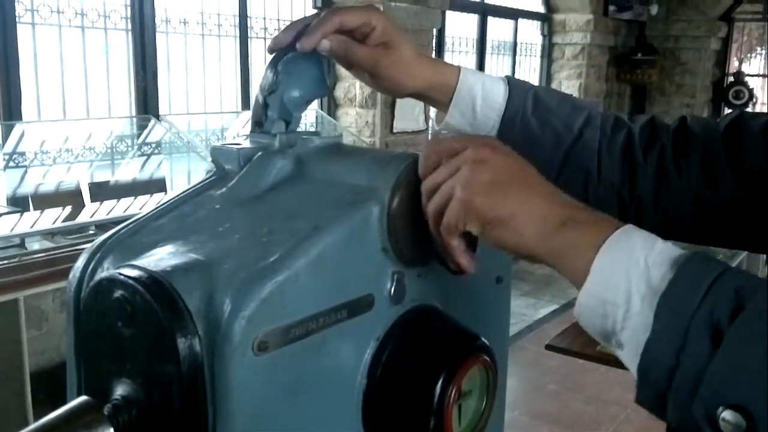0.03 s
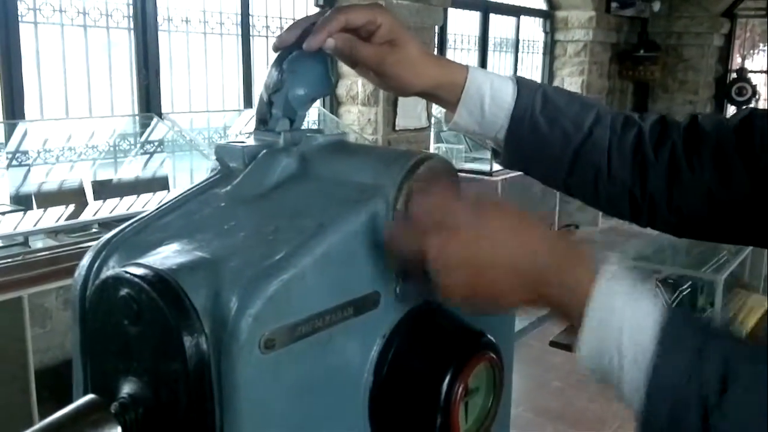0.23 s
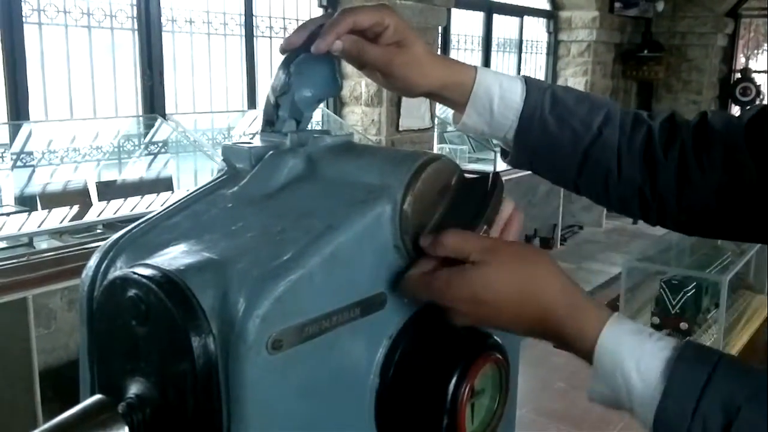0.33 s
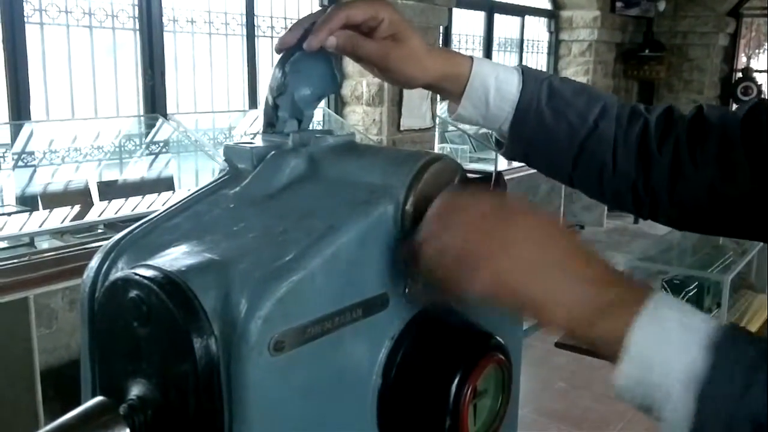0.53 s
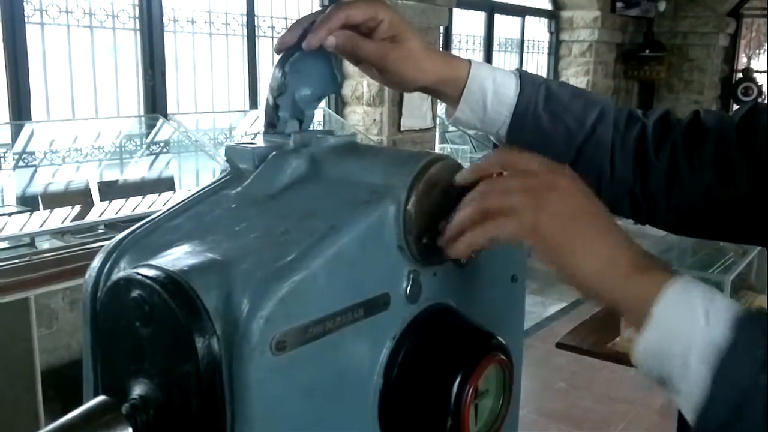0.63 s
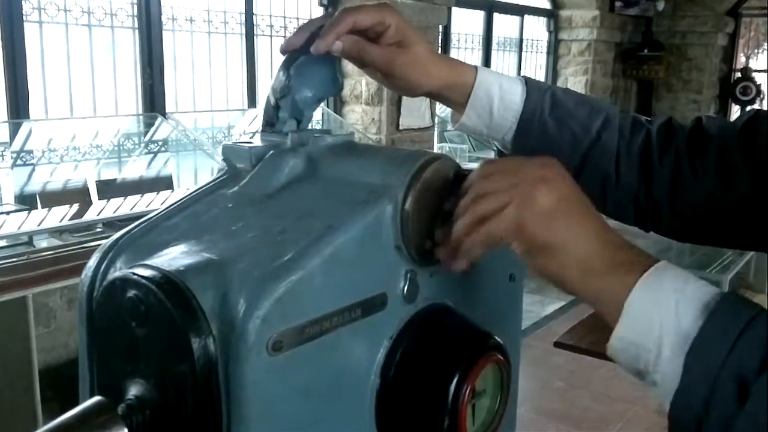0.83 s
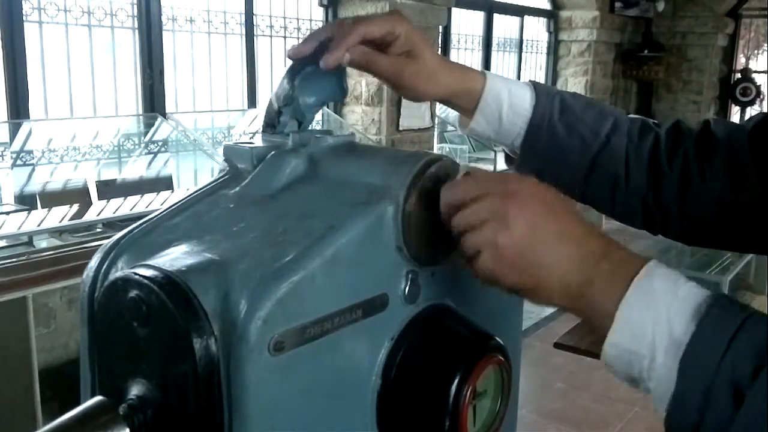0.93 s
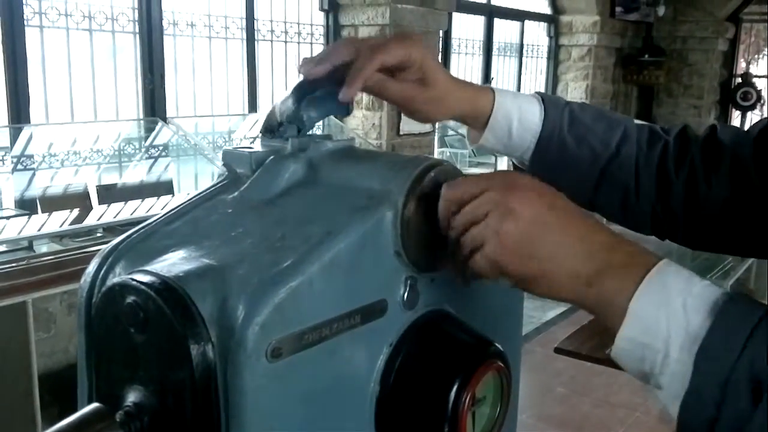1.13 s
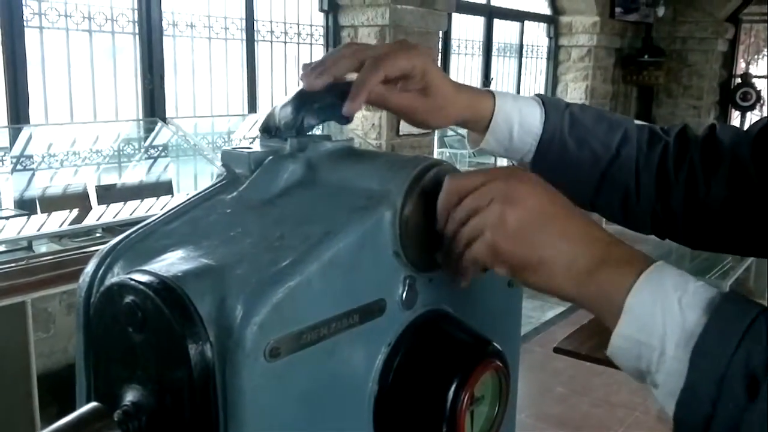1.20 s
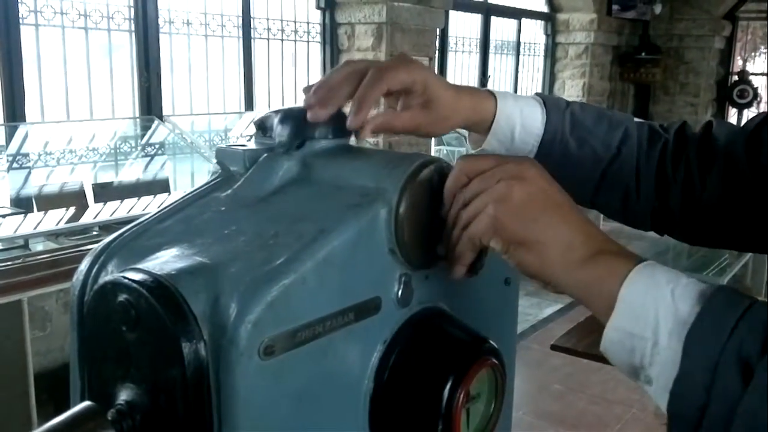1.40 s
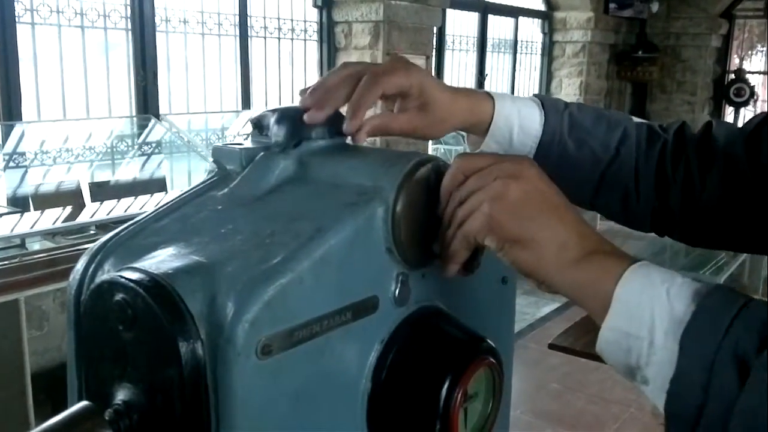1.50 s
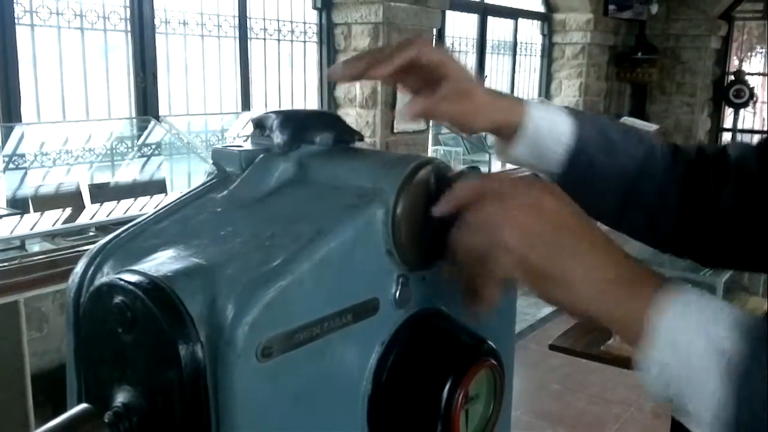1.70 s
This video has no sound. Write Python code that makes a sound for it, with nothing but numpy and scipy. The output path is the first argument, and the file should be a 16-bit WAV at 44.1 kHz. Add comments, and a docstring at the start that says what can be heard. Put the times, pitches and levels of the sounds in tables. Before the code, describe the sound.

Close metal clacking from a heavy old machine in a hard, reverberant room: first a turned knob rattles and thumps the hollow housing, then a lever moves through several clacks, ending in a bright ring and small tick.

```python
"""A clack dies away in a hard, echoing hall, where two hands work an old cast-metal machine.
A side knob is swung round and its gearing clatters against a stop, making the hollow housing boom.
Then a lever on top is pushed over in a run of clacks and lands with a steel ring and a small last tick.
Every contact keeps the casting ringing; a noise suppressor turns down the faint treble."""
import sys
import numpy as np
from scipy import signal
from scipy.fft import rfft, irfft, next_fast_len
from scipy.io import wavfile
from scipy.ndimage import uniform_filter1d, minimum_filter1d

SR = 44100
rng = np.random.default_rng(int(sys.argv[2]) if len(sys.argv) > 2 else 0)


def store_wav(level_fs):
    """Save 16-bit WAV to argv[1]."""
    pcm = np.round(np.clip(np.atleast_2d(level_fs), -1, 1) * 32767)
    wavfile.write(sys.argv[1], SR, pcm.T.astype(np.int16))


N = 77175
LEAD = SR // 2  # samples before time zero
TOTAL = N + LEAD


def amp(db):
    """Decibels to gain."""
    return 10 ** (np.asarray(db) / 20)


def pan(left_minus_right_db):
    """Left and right gains."""
    return amp([[left_minus_right_db / 2], [-left_minus_right_db / 2]])


def at_hz(points, hz, column=1):
    """Read a table column on a log-frequency axis."""
    table = np.array(points)
    return np.interp(np.log(np.maximum(hz, 1)), np.log(table[:, 0]), table[:, column])


def decay(t, t60_s):
    """Exponential fall by 60 dB in t60_s."""
    return np.exp(-np.log(1000) * t / t60_s)


def add(out, start_s, sound):
    """Mix a sound in at start_s."""
    i = max(int(start_s * SR) + LEAD, 0)
    part = sound[..., :out.shape[-1] - i]
    out[..., i:i + part.shape[-1]] += part


def colour(x, db_at):
    """Minimum-phase filter with the given dB curve."""
    size = next_fast_len(x.shape[-1], True) * 2
    hz = np.arange(size // 2 + 1) * SR / size
    cepstrum = irfft(np.log(amp(db_at(hz))))
    cepstrum[1:size // 2] *= 2
    cepstrum[size // 2 + 1:] = 0
    return irfft(rfft(x, size) * np.exp(rfft(cepstrum)))[..., :x.shape[-1]]


def even_noise(length, block=256):
    """Blocks of random-phase noise with a flat spectrum, rms 1."""
    phases = rng.random((2 * length // block, block // 2 + 1))
    blocks = irfft(np.exp(2j * np.pi * phases))
    return (blocks / blocks.std(axis=1, keepdims=True)).ravel()[:length]


def ring(modes, rise_s=0.00072):
    """Struck metal: decaying sines with random phases."""
    t = np.arange(SR) / SR
    sines = sum(amp(db) * decay(t, t60_s) * np.sin(2 * np.pi * (hz * t + rng.random()))
                for hz, db, t60_s in modes)
    return sines * np.minimum(t / rise_s, 1)


# The casting's colour. Each row: frequency in Hz, gain in dB.
CASTING_COLOUR = [(40, -8.5), (100, -38), (200, 1.5), (450, 0), (680, 5.5), (900, 2), (1200, 2.5),
                  (1700, 2.5), (2400, -2.5), (3200, 0), (4300, 3.5), (5300, -2.5), (6500, -4.5),
                  (8500, -5.5), (11000, -2), (15000, -12.5)]


def contact_colour(register_db, part_hz, part_db, width_oct=0.12):
    """dB curve of one contact: casting, register balance and the struck part's resonance."""
    registers = list(zip([300, 1000, 4000, 11000], register_db))  # bass, clack, snap, top in Hz

    def db_at(hz):
        detune_oct = np.log2((hz + 1) / part_hz)
        resonance_db = part_db / (1 + (detune_oct / width_oct) ** 2)
        return at_hz(CASTING_COLOUR, hz) + at_hz(registers, hz) + resonance_db
    return db_at


# Each row: start in seconds, bass, clack, snap and top levels in dB, t60 in seconds,
# pitch of the struck part in Hz, its emphasis in dB.
METAL_CONTACTS = [ (-.33, -5.5, 2, -7.5, -54, 0.11, 1280, 3), (0.206, -26, -16, -52, -78.5, .04, 650, 0),
                  (.211, -13, -2, -33.5, -57, 0.059, 1200, 6.5),
                  (0.2369, -1.5, -3.5, 3.5, -25, 0.024, 1500, 5.5),
                  (.256, -9.5, -3.5, -18.5, -35.5, 0.16, 1200, 0),
                  (.279, -7, 4.5, -12.5, -19, 0.055, 6160, 7), (0.2972, -17.5, 0, -22, -64, .06, 714, 2.5),
                  (0.3033, -9.5, 4.5, -26, -34, 0.037, 1165, 7),
                  (.315, -9.5, 3.5, -8.5, -46, 0.023, 4550, 11.5),
                  (.768, -14, -8.5, -40, -83, 0.053, 1300, 1),
                  (.812, -18.5, -34, -61, -90, 0.059, 387, 13.5),
                  (0.879, -12.5, -28.5, -63, -88, 0.054, 474, 13.5),
                  (.892, -13.5, -17.5, -32.5, -85.5, 0.047, 383, 7),
                  (.906, -12, -24.5, -27.5, -90, 0.078, 358, -5), (0.931, -24, -12, -15, -65, 0.1, 3100, 6),
                  (.951, -12.5, -7, -20, -66, 0.03, 670, 13.5),
                  (.962, -18, -1.5, -21.5, -77, 0.036, 665, 8.5),
                  (0.989, -13, -2, 4, -33.5, 0.029, 6800, 5.5),
                  (1.0783, -13, -3.5, -1, -31, 0.031, 1125, 7.5),
                  (1.1649, -8.5, -10, -9.5, -47, 0.038, 810, 5),
                  (1.204, -15, -23.5, -15.5, -44.5, 0.061, 10300, 4),
                  (1.237, -19, -16, -30, -66, 0.055, 684, 0),
                  (1.4404, -37, -3, -1.5, -54, 0.014, 1144, 6.5),
                  (1.455, -28, -25, -15.5, -41, 0.027, 1150, 3),
                  (1.667, -48, -18, -20.5, -64, 0.025, 1076, 10)]


def clacks(crack_db=-2, crack_t60_s=0.012, rise_s=0.00098, scatter_hz=5130):
    """Each contact cracks, then rings in the works' dense modes; treble scatters unequally to each side."""
    out, t = np.zeros((2, TOTAL)), np.arange(SR // 6) / SR
    highpass = signal.butter(1, scatter_hz, "high", fs=SR)
    crack = amp(crack_db) * decay(t, crack_t60_s)
    for start_s, *register_db, t60_s, part_hz, part_db in METAL_CONTACTS:
        mid = even_noise(len(t))
        side = signal.lfilter(*highpass, even_noise(len(t))) / 2
        envelope = (decay(t, t60_s) + crack) * np.minimum(t / rise_s, 1)
        burst = np.array([mid + side, mid - side]) * envelope / np.sqrt(2)
        add(out, start_s, colour(burst, contact_colour(register_db, part_hz, part_db)))
    return out


# Each row: frequency in Hz, level in dB relative to the clack, t60 in seconds.
CASTING_LONG_MODES = [(610, -57.5, 0.2), (641, -43, 0.43), (677, -54, 0.51), (847, -53.5, 0.57),
                      (963, -50.5, 2.15), (990, -46.5, 1.5), (1076, -44.5, 2.6), (1228, -38.5, 0.89),
                      (1376, -59.5, .7), (1607, -59.5, 0.44)]


def casting_ring():
    """Every contact excites the long modes of the casting."""
    out = np.zeros(TOTAL)
    for start_s, _, clack_db, *_ in METAL_CONTACTS:
        add(out, start_s, amp(clack_db) * ring(CASTING_LONG_MODES))
    return out


# Each row: frequency in Hz, t60 in seconds, level in dB, left-right correlation, left minus right in dB.
HALL_BANDS = [(118, 0.23, -14.5, .95, -4), (349, 1.54, 4.5, 0.87, 0), (720, 1.33, 1, 0.91, -1),
              (1300, 2.03, -5, 0.47, 1.5), (2228, 1.39, 1, -0.52, -3), (3900, 0.97, -2, 0.27, -5),
              (5730, 0.59, 0.5, 0.073, -2.5), (8800, 0.33, -1, -0.19, -4), (14000, 0.16, -11.5, 0.092, 4.5)]


def hall_echo(x, early_t60_s=0.15, onset_s=0.0056):
    """Early echoes off nearby surfaces and a long diffuse tail that dies sooner in the treble."""
    t = np.arange(N // 2 * 2) / SR
    white = rfft(rng.standard_normal((2, len(t))))
    bin_hz = np.arange(white.shape[1]) * SR / len(t)
    octave = np.log2(np.maximum(bin_hz, 60) / 60)
    early = decay(t, early_t60_s)
    response = 0
    for band in range(18):  # half octaves
        hz = 60 * 2 ** (band / 2)
        mid, side = irfft(white * np.maximum(1 - abs(2 * octave - band), 0))
        t60_s, db, correlation, pan_db = (at_hz(HALL_BANDS, hz, column) for column in range(1, 5))
        tail = decay(t, t60_s)
        envelope = amp(db) * np.hypot(tail / np.linalg.norm(tail), early / np.linalg.norm(early))
        pair = np.sqrt((1 + correlation) / 2) * mid + np.sqrt((1 - correlation) / 2) * side * [[1], [-1]]
        response = response + pair * envelope * pan(pan_db)
    response *= np.minimum(t / onset_s, 1) ** 2
    return signal.fftconvolve(x[None], response, axes=1)[:, :TOTAL]


# Each row: frequency in Hz, level in dB.
AIR_SPECTRUM = [(30, -40), (70, -42), (140, -40.5), (300, -35.5), (700, -43), (1300, -38.5), (2500, -50),
                (4000, -61.5), (6000, -65), (10000, -70), (15000, -77)]


def room_tone(wide_above_hz=800):
    """Steady air in the hall, alike on both sides in the bass."""
    mid, side = rng.standard_normal((2, TOTAL))
    side = signal.lfilter(*signal.butter(1, wide_above_hz, "high", fs=SR), side)
    air = np.array([mid + side, mid - side]) / np.sqrt(2)
    return colour(air, lambda hz: at_hz(AIR_SPECTRUM, hz))


# Each row: start in seconds, pitch in Hz, level in dB, swell in seconds, t60 in seconds.
HOUSING_SHOVES = [(.208, 130.1, -21, 0.045, 0.97), (.262, 128.3, -21, 0.044, .28),
                  (.415, 129, -35.5, 0.025, 0.13), (0.641, 177.5, -43, 0.028, 0.16),
                  (0.799, 139, -24, 0.033, 0.043), (.895, 160, -21, 0.027, 0.092),
                  (0.953, 121, -32, 0.01, 0.1), (1.071, 172.3, -28.5, 0.021, 0.071),
                  (1.165, 182, -35, 0.032, 0.27), (1.211, 128, -31, 0.021, 0.24),
                  (1.303, 127, -39, 0.027, 0.16), (1.471, 148.8, -46.5, 0.046, .4)]


def housing_boom(thud_db=-12, thud_band_hz=(66.5, 237.6)):
    """A soft shove swells a low air mode of the hollow housing, with a dull thud around it."""
    out, t = np.zeros(TOTAL), np.arange(SR) / SR
    bandpass = signal.butter(2, thud_band_hz, "band", fs=SR, output="sos")
    for start_s, hz, db, swell_s, t60_s in HOUSING_SHOVES:
        air_mode = np.sin(2 * np.pi * hz * t)
        thud = signal.sosfilt(bandpass, rng.standard_normal(len(t)))
        envelope = np.minimum(t / swell_s, 1) * decay(np.maximum(t - swell_s, 0), t60_s)
        add(out, start_s, amp(db) * envelope * (air_mode + amp(thud_db) * thud / thud.std()))
    return out


# Each row: start in seconds, low-mode level in dB, high-mode level in dB.
LEVER_LANDINGS = [(1.442, -28, -33), (1.451, -30.5, -19.5), (1.654, -45, -21.5)]
# Each row: frequency in Hz, level in dB relative to the landing, t60 in seconds.
STEEL_MODES = [(3560, -15, .55), (3660, -8, 0.67), (4522, 4, 0.56), (4520, -13, 0.67), (4490, -7, .4),
               (5453, -4.5, 0.3), (5600, 6, 0.15), (8258, -17.5, 0.075), (8700, -21, .06),
               (9800, -31, 0.12), (13650, -43, .1)]


def lever_ring(crossover_hz=(5500, 8000)):
    """The steel lever lands and settles; its close modes beat, with different phases on each side."""
    out = np.zeros((2, TOTAL))
    for start_s, *low_high_db in LEVER_LANDINGS:
        modes = [(hz, db + np.interp(hz, crossover_hz, low_high_db), t60_s)
                 for hz, db, t60_s in STEEL_MODES]
        add(out, start_s, np.array([ring(modes), ring(modes)]))
    return out


def microphones(x, pan_db=5, right_lag_s=0.00015):
    """The machine is nearer to the left microphone."""
    n = np.arange(TOTAL)
    right = np.interp(n - right_lag_s * SR, n, x[1])
    return np.array([x[0], right]) * pan(pan_db)


# Each row: frequency in Hz, threshold in dB, depth in dB.
SUPPRESSOR_BANDS = [(2000, -57.5, 0), (2590, -43, 5.5), (3110, -40, 17), (4214, -41.5, 16),
                    (5300, -51.5, 10.5), (7000, -55.5, 10), (10000, -67.5, 5), (14940, -67.5, 7.5)]


def suppress_noise(x, knee_db=1.3, frame=512, overlap=384):
    """Treble bands that sink under a threshold are turned down further."""
    hz, _, spectra = signal.stft(x, SR, nperseg=frame, noverlap=overlap)
    power = np.mean(abs(spectra) ** 2, axis=0)
    power = uniform_filter1d(power, size=11, axis=0)  # over frequency
    power = uniform_filter1d(power, size=5, axis=1)  # over time
    level_db = 10 * np.log10(np.maximum(power, 1e-20) * frame / 1.5)
    threshold_db, depth_db = (at_hz(SUPPRESSOR_BANDS, hz, column)[:, None] for column in (1, 2))
    closed = (1 + np.tanh((threshold_db - level_db) / (2 * knee_db))) / 2
    return signal.istft(spectra * amp(-depth_db * closed), SR, nperseg=frame, noverlap=overlap)[1][:, :N]


def limit(x, ceiling=0.95):
    """A quick look-ahead limiter holds the peaks under full scale."""
    gain = minimum_filter1d(ceiling / np.maximum(abs(x).max(axis=0), ceiling), size=129)
    return x * uniform_filter1d(uniform_filter1d(gain, size=63), size=63)


def scene(boom_pan_db=-3.5, lever_send_db=-7.5):
    """The machine close by, its echo in the hall, and room tone."""
    works, casting, lever, boom = clacks(), casting_ring(), lever_ring(), housing_boom()
    direct = microphones(works + casting) + lever + boom * pan(boom_pan_db)
    echo = hall_echo(works[0] + boom + amp(lever_send_db) * lever[0])
    return (direct + echo + room_tone())[:, LEAD:]


def record(dry, stopband_hz=16600):
    """Noise suppressor, limiter and a steep low-pass."""
    lowpass = signal.cheby2(14, 60, stopband_hz, fs=SR, output="sos")
    return signal.sosfilt(lowpass, limit(suppress_noise(dry)))


dry = scene()
out = record(dry)
store_wav(out)
```